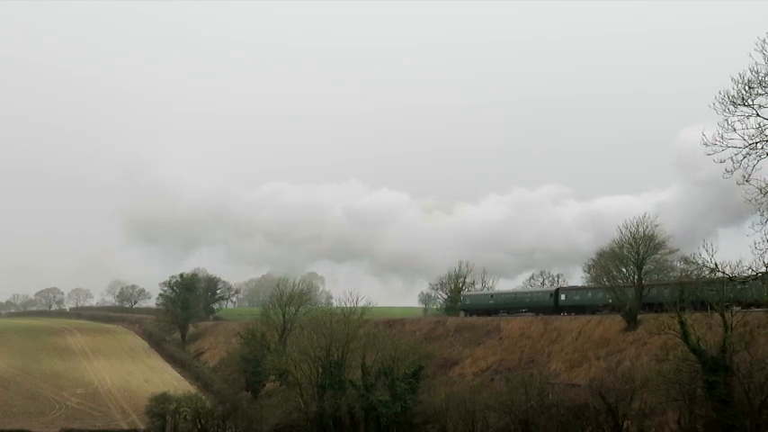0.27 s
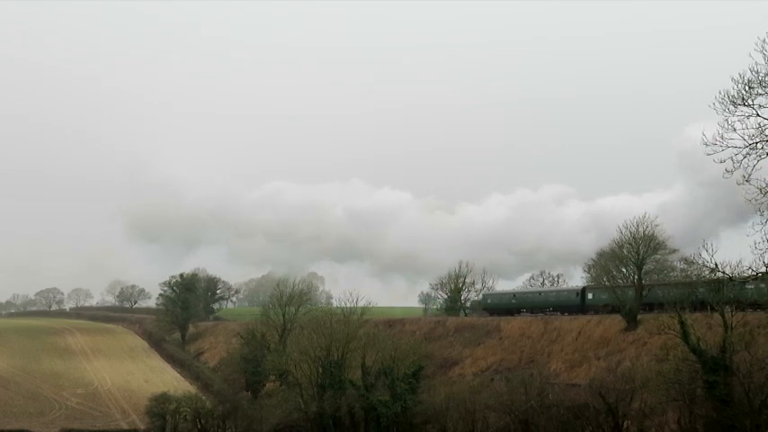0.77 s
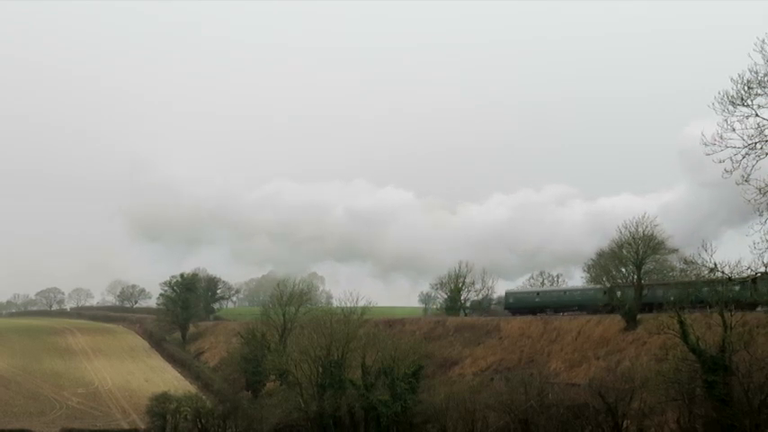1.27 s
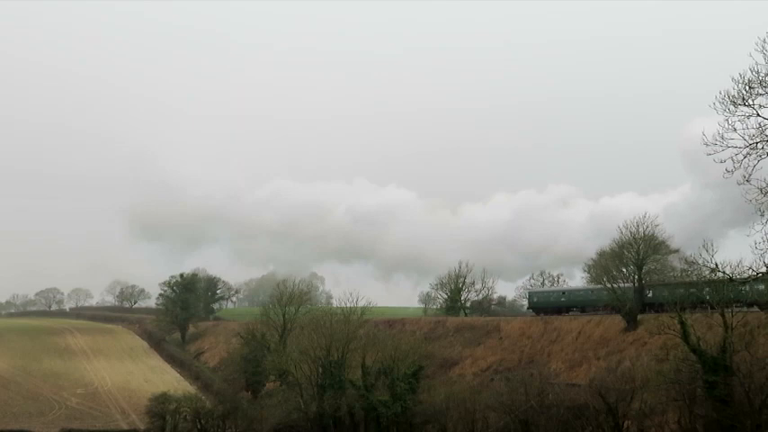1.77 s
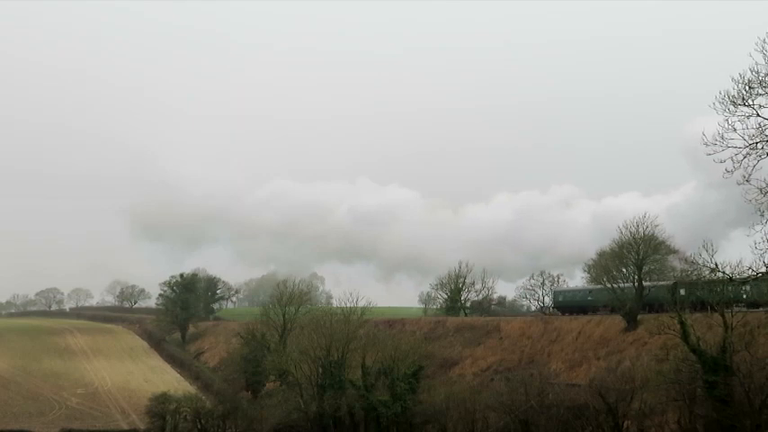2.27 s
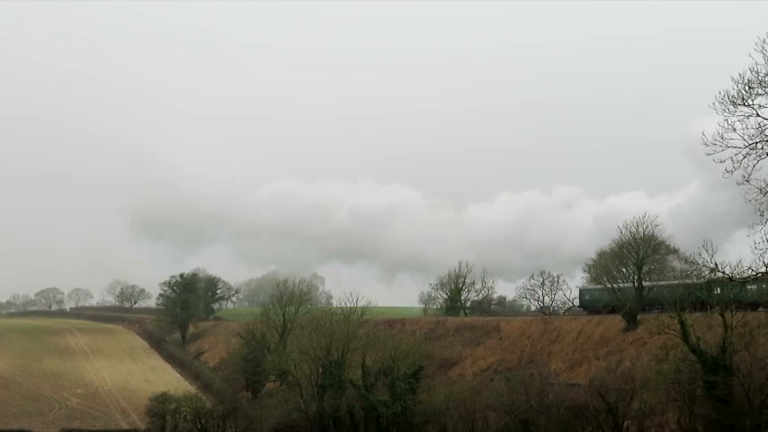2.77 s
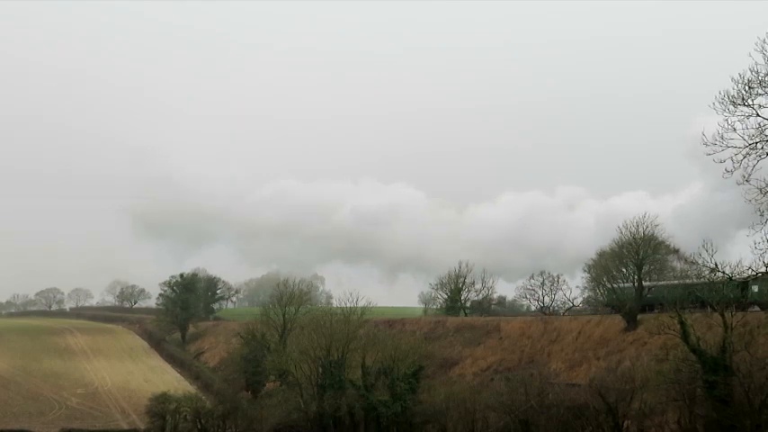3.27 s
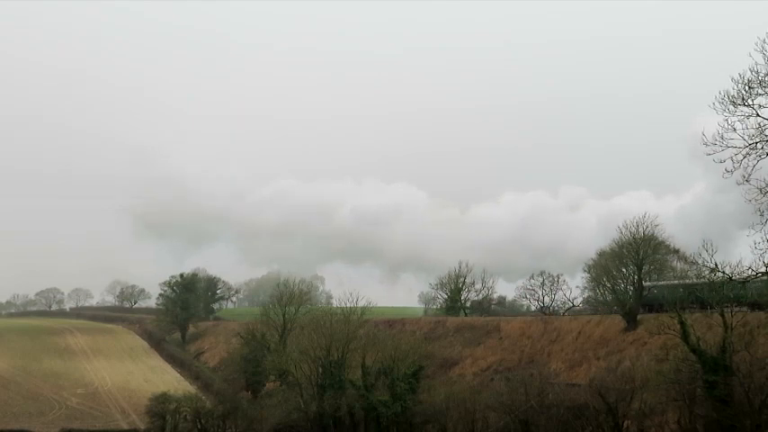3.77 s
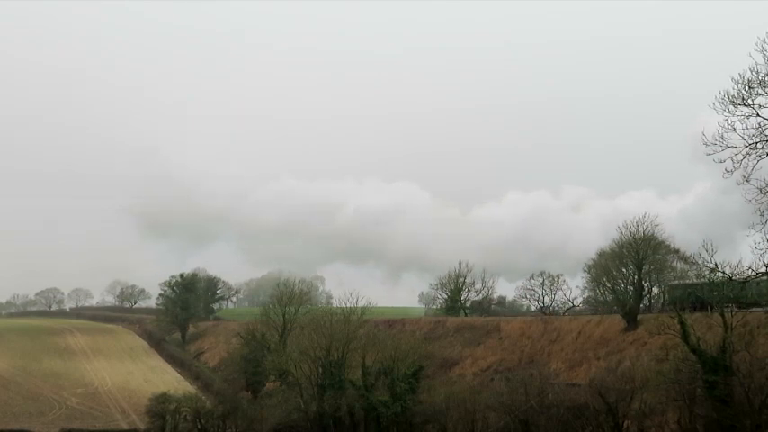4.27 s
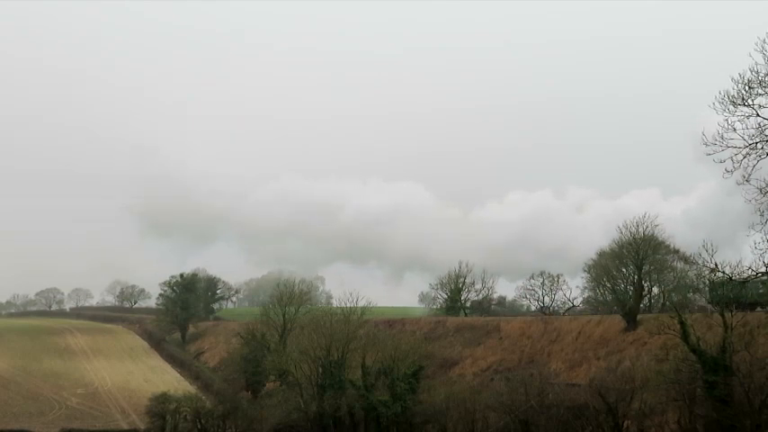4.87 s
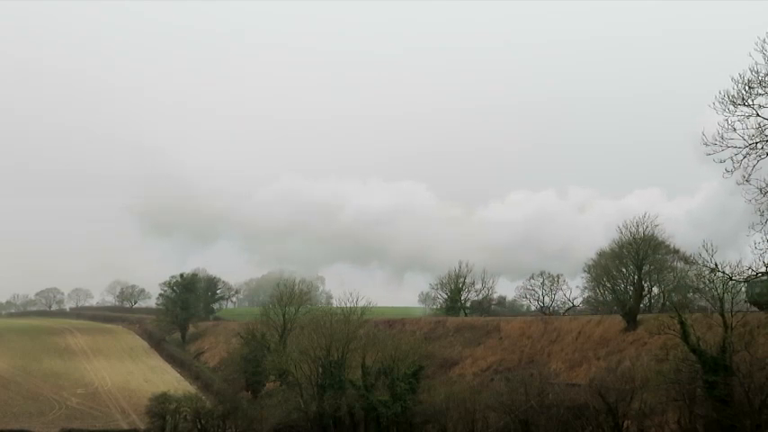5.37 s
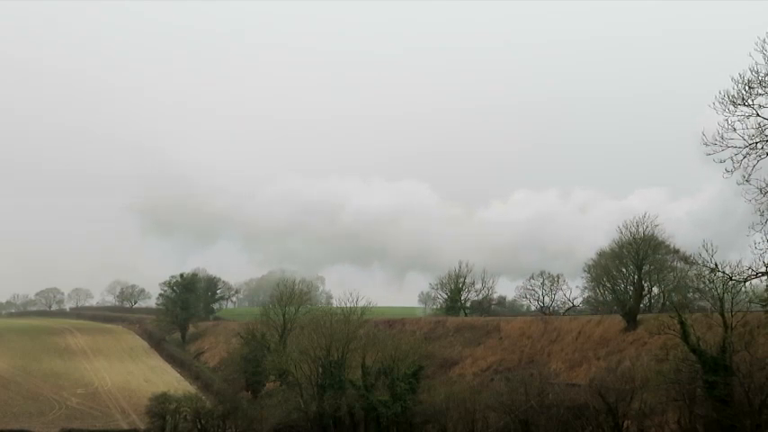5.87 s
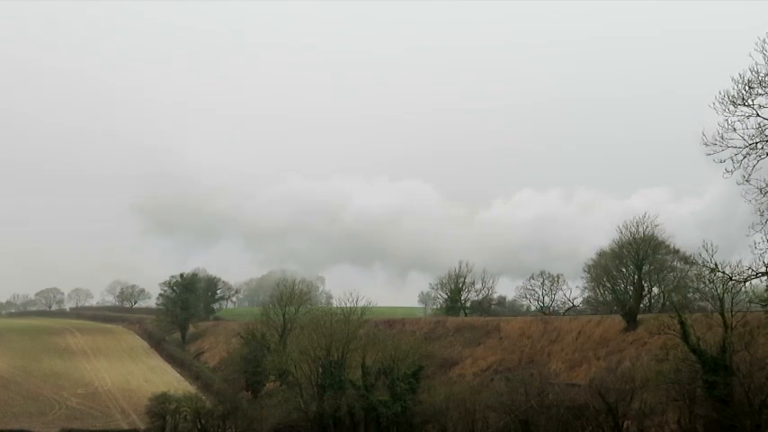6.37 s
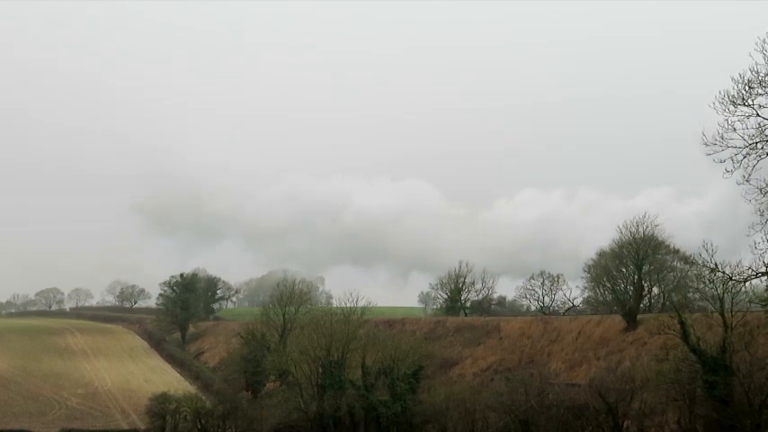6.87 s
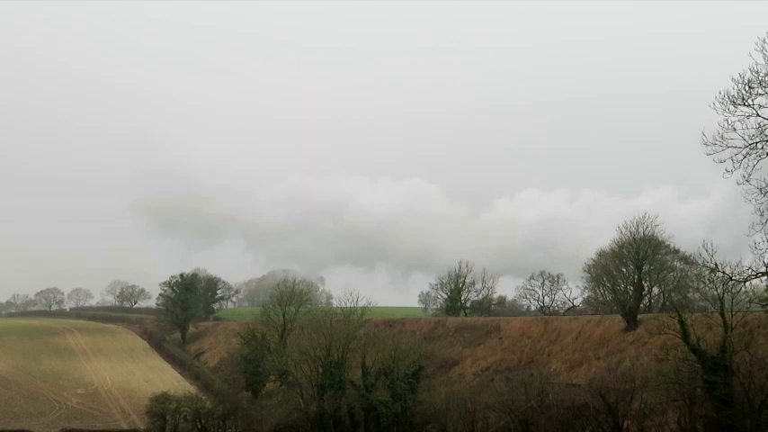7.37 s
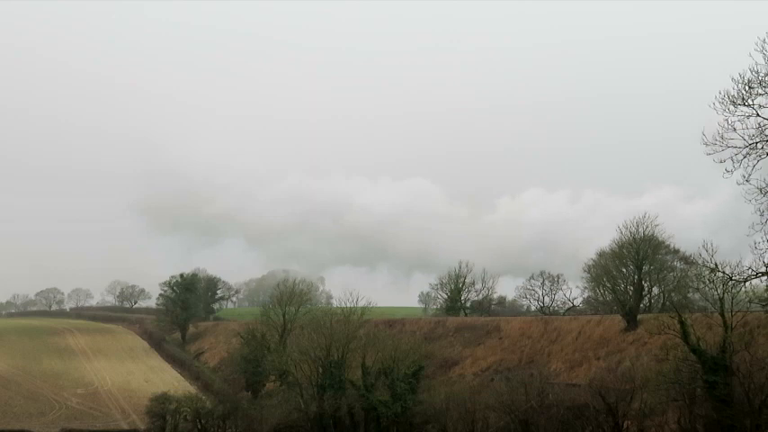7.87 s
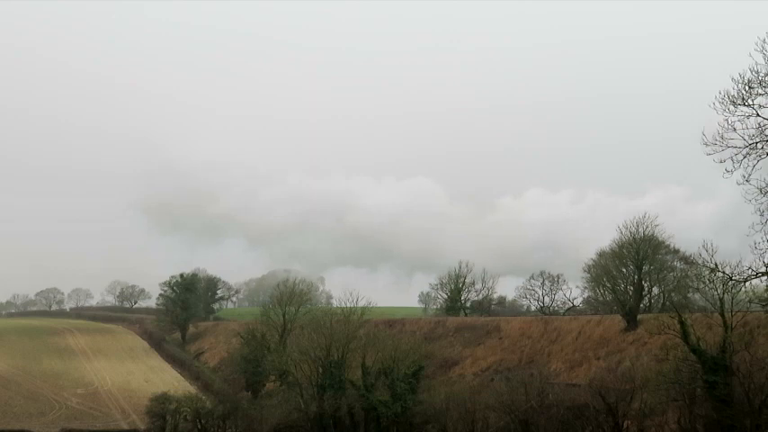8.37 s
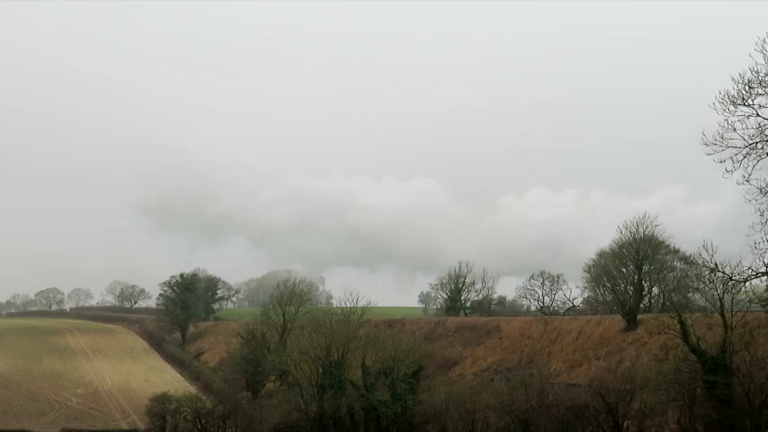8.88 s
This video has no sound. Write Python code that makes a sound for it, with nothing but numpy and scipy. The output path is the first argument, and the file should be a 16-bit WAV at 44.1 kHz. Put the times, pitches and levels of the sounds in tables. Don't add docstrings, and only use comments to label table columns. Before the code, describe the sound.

Quick chimney beats from a departing steam train run continuously, overlapping into a pulsing, low-mid roar with uneven accents. Early puffs are fuller and brighter; later ones become duller, fluctuate, and finally drop away. Low wheel rumble and faint rail singing continue beneath, with muffled thumps around the middle and near the end, and a brief weak metallic squeal after six seconds. The setting is open countryside, heard at a distance through a close stereo microphone pair with light hiss.

```python
import sys
import numpy as np
from scipy import signal
from scipy.fft import rfft, irfft, next_fast_len
from scipy.io import wavfile
from scipy.ndimage import uniform_filter1d

SR = 44100
rng = np.random.default_rng(int(sys.argv[2]) if len(sys.argv) > 2 else 0)


def waveform_to_disk(signal):
    frames = np.transpose(np.atleast_2d(signal))
    scaled = np.clip(frames, -1, 1) * 32767
    samples = np.round(scaled).astype(np.int16)
    wavfile.write(sys.argv[1], SR, samples)


def attenuation_scalar(level_db):
    decades = np.asarray(level_db, float) / 20
    return 10 ** decades


N = 402633
M = next_fast_len(N + SR)
HZ = np.maximum(np.fft.rfftfreq(M, 1 / SR), 1)
OCTAVES = np.log2(HZ)
T = np.arange(M) / SR - .5

# frequency in Hz, level in dB.
SELF_NOISE = [(500, -18), (2000, -8.5), (5000, -10.5), (8000, -13.5), (11500, -16), (12600, -18.5),
              (13500, -22), (14500, -26)]
SELF_NOISE_DB = -64
# frequency in Hz, gain in dB, left minus right in dB, lead of the right in radians.
PORTS = [(30, 0, .3, .02), (60, 0, 1.2, .12), (120, 0, 1.9, .42), (200, 0, 1.0, .82), (300, 0, -.3, 1.05),
         (470, 0, -1.2, 1.22), (530, -7, -2.8, .01), (1000, -7, -5.0, .1), (2000, -7, -3.8, .42),
         (4000, -7, -3.0, 1.2), (7000, -7, -2.0, 1.5)]

# frequency in Hz, level in dB.
SCATTER = [(30, -14.5), (500, -20), (1000, -30), (2000, -20), (4000, -19.5), (8000, -16)]
# time in seconds, level in dB, bass over the ground in dB.
ROLL = [(0, -24, 0), (.4, -24.5, 3), (1.8, -25.5, 0), (2.5, -26.5, 3), (3.2, -27, 0.5), (4.1, -27, -0.5),
        (4.7, -29, 0.5), (5.2, -29, 3.5), (5.8, -28.5, 0.5), (6.5, -30, 3), (7.0, -32, 3.5), (7.6, -30, 1),
        (8.3, -30.5, 3.5), (8.9, -30.5, -1), (9.13, -33.5, 5)]
# frequency in Hz, density in dB per Hz.
WHEELS = [(20, -22), (35, -7.5), (60, -3), (120, -0.5), (200, -1), (300, -1), (450, -3.5), (800, -10.5),
          (1400, -14), (2500, -20.5), (3300, -25.5), (4500, -32), (7000, -43.5), (12000, -63)]
# frequency in Hz, width in Hz, level over the rumble in dB.
RAILS = [(1300, 63, -9.5), (2022, 34, -0.5), (2533, 79, -1.5), (3126, 58, -0.5)]
BASS_SWELL_DB, BASS_DRIFT_DB_S = .6, 0.32
TREBLE_DB, TREBLE_DRIFT_DB_S = -2.05, -0.07
# start in seconds, pitch in Hz, level in dB, ring t60 in seconds.
KNOCKS = [(3.655, 1310, -24, 0.15), (3.655, 2080, -24, 0.044), (5.115, 140.6, -15.5, 0.26),
          (5.159, 94.8, -14.5, 0.18), (4.619, 77.6, -18, 0.28), (2.429, 96, -15, .25),
          (4.107, 116, -19.5, 0.3), (5.4, 133, -14.5, 0.24), (7.869, 126.4, -18.5, .25),
          (8.20, 122.5, -16.5, 0.25), (8.56, 70.3, -18.5, 0.27)]
# time in seconds, pitch in Hz, level in dB.
SQUEAL = [
    (6.08, 2250, -77),
    (6.15, 2400, -44),
    (6.25, 2600, -47),
    (6.34, 2650, -50),
    (6.42, 2650, -82),
]

# frequency in Hz, width in Hz, level in dB.
BOOM = [(89, 59, -10.5), (154, 110, -11), (214.5, 32, 4)]
BARK = [(294.5, 34, 0.2), (391, 86, 0.3), (463.6, 83, -5)]
ROAR = [(578, 180, 0.0085), (665, 180, 0.007)]
RUSH = [(807, 330, 0.6), (996, 83, 0), (1240, 450, -1.5)]
HISS = [(1910, 930, 8.5), (2660, 2800, -2.5), (4500, 14000, -5.5)]
# frequency in Hz, width in Hz, level in dB.
BOOM_FAR = [(87, 100, -11), (151, 25, -3), (200, 88, 2)]
BARK_FAR = [(287, 53, -3), (378, 100, 1), (453, 53, 2.8)]
ROAR_FAR = [(593, 200, -0.92), (750, 170, 0.42)]
RUSH_FAR = [(810, 320, 4), (972, 220, 4.1), (1280, 410, -0.5), (1665, 540, -9)]
FAR_FROM_S, FAR_BY_S = 3.9, 5.9
AIR_DB = 11.5

FIRST_S, BEAT_S, BEAT_COUNT = .004, .1374, 67
SLOWS_FROM_BEAT, SLOWING_S = 24, 4.5e-5
VALVES_DB = [0.89, 0.083, -1.7, 0.48]
# time in seconds, bark level in dB, treble past hedges and banks in dB.
PATH = [(0, -25, -5), (.55, -22, 0.5), (1.05, -24, 4.5), (1.5, -23.5, -1), (2.05, -30, -5),
        (2.4, -31.5, -3.5), (3.0, -26.5, 0.5), (3.5, -30.5, -3.5), (4.0, -26, 0), (4.55, -28, 3),
        (4.95, -30.5, -1), (5.2, -32, 5.5), (5.5, -26, 4.5), (6.3, -32, 4), (6.6, -30, 4), (7.1, -28.5, -1),
        (7.8, -26, -4.5), (9.1, -42.5, -3.5)]
# level against the bark in dB, drift with distance in dB per second,
# share of the treble shading.
PARTS = [
    (5.5, -1.1458, 0.0094),
    (1.5, 0.26, 0.18),
    (-9, -1.05, 0.77),
    (-16, 1.5, 1.02),
    (-21.5, -0.01, 0.27),
]
# rise, fall and lead in seconds.
VALVE_SHAPES = [
    (0.044, 0.05, 0.0043),
    (0.039, 0.051, 0.002),
    (0.042, 0.065, .003),
    (0.041, 0.055, 0.0034),
    (.042, 0.068, .002),
]
FLAT_RISE, FLAT_FALL = 2.6, 1.66
# time in seconds, boom, bark, roar and rush in dB.
ACCENTS_NEAR = [(0.004, 2.5, 7, -7.5, 6.5), (0.141, -1, 2, 5.5, -5), (0.279, 3, 3.5, 4, 2),
                (0.416, -6, 2, 5.5, 3), (0.554, -10, 0.5, -2, 0), (0.691, 3, -4, 6, 1),
                (0.828, 1.5, -1, -0.5, 0.5), (0.966, 2.5, 0.5, 1.5, 2), (1.103, 1, 1.5, -3.5, 1),
                (1.241, -1.5, -1.5, -1, -2.5), (1.378, 1, -3, -0.5, -3.5), (1.515, -0.5, -1, 4, 1.5),
                (1.653, 2, -2.5, -0.5, -4), (1.79, 6, -3.5, 1.5, 7), (1.928, 7.5, -1.5, -1.5, -12),
                (2.065, 6, 3.5, 7.5, -2), (2.202, 4.5, 0, -10, 4), (2.34, -1.5, -3.5, -0.5, 2),
                (2.477, 1.5, 1, 2.5, 3), (2.615, 5, -2, 0, 0.5), (2.752, 2, -2.5, -11, 0),
                (2.889, 1, -4.5, -2, -3), (3.027, -4, -8, -3, -3), (3.164, 4, -4, -11, 1.5),
                (3.302, 4, -0.5, -3, 1), (3.439, 6.5, 2.5, 7.5, 4.5), (3.577, 2, -2.5, -7, -6),
                (3.714, 4.5, -0.5, 4, -3.5), (3.852, 4, -5, -5.5, -2), (3.99, 4.5, 1.5, -5, -4),
                (4.128, -3.5, -0.5, -7.5, -2), (4.266, -2.5, 1.5, 2, -2.5), (4.404, 2.5, 0, 3.5, -2)]
ACCENTS_FAR = [(4.542, -6, -4, 4, -1.5), (4.68, 2.5, -3.5, 7.5, -1), (4.818, -2.5, 1.5, 7, 4),
               (4.957, 4.5, 3, 10, 9.5), (5.095, 6.5, 3, 7.5, 4), (5.234, 6.5, 1.5, -0.5, 3),
               (5.373, 3, -0.5, 2, 1), (5.512, 1.5, -0.5, -14, -1.5), (5.65, -3, -0.5, -12, -3),
               (5.789, 4.5, 2, 1, 0.5), (5.928, 5, -1.5, 10, -1), (6.068, 1, 1.5, 5, -2),
               (6.207, 8.0, 1.5, 3.5, 1), (6.346, 2.5, 3, 7, 3), (6.487, 6, 1, 5.5, 2.5),
               (6.625, 11, 3.5, 5, 2.5), (6.765, 5.5, 4.5, -2, 3), (6.904, 3.5, 2.5, -5.5, 4),
               (7.044, 4, 2, 6, 3), (7.184, 8.5, 0, 8, 2.5), (7.324, 2.5, 1.5, 3.5, -0.5),
               (7.464, 1, -2, -1, -1), (7.604, 0.5, -1.5, 2.5, -2), (7.744, -2.5, -3.5, 3, -2),
               (7.885, -16.5, -6, -15, -2), (8.025, -10.5, -0.5, 5, 1), (8.166, -3, -5, -3.5, 2),
               (8.306, -5, 0, 3, 0.5), (8.447, 8.5, -2.5, 4, 3.5), (8.588, 7, 3.5, -5, 3.5),
               (8.729, -3, -1.5, 3, 1), (8.87, 5, 2.5, -4.5, 0.5), (9.012, -13.5, 2.5, -1, 4.5)]
HISS_ACCENTS_DB = [2.5, 1, 3, 3.5, 4, 5, 2.5, 1, 2.5, -1, 0, 0, -0.5, 7.5, 4, 9, 0, 2, 4, 3, 5, -4, 1, 1, 1,
                   7, -8, -2, -11, -1, 2, -0.5, 1.5, 3.5, -4, -3, -4, 0, 1, 1, 1, 0, 4, 1, 4, 5, 0, -3, -4.5,
                   -5, 2, 4, 0, -9, 4, 2, 0, -1, -2, 5, 3, 8, -1, -5, 0, 7, 13.5]
CHANCE_DB = .2
# start in seconds, roar in dB, rush in dB.
SLUGS = [(0.02, -20, -36), (0.097, -26.5, -36), (0.116, -17, -27), (0.137, -15.5, -36), (0.235, -20.5, -41),
         (0.26, -16.5, -33.5), (0.382, -20, -36), (0.515, -18.5, -36.5), (0.536, -14.5, -28),
         (0.576, -16, -39.5), (0.65, -14.5, -29), (0.677, -13.5, -26.5), (0.783, -16, -29),
         (0.92, -24.5, -41), (0.949, -24.5, -30), (1.08, -16, -26.5), (1.206, -19, -25),
         (1.226, -20.5, -27), (1.314, -20.5, -40), (1.338, -20, -28.5), (1.379, -19.5, -32.5),
         (1.48, -15.5, -35.5), (1.622, -27.5, -38.5), (1.697, -14.5, -30), (1.756, -22, -35.5),
         (2.303, -34.5, -41.5), (2.591, -21.5, -37), (2.755, -24.5, -48), (2.899, -29.5, -32),
         (3.71, -23.5, -31), (4.234, -23.5, -47), (4.384, -22, -39), (4.402, -16, -30.5),
         (4.783, -33, -39.5), (4.804, -22.5, -32.5), (4.927, -18.5, -28), (5.061, -29, -32),
         (5.336, -23, -28.5), (5.477, -20, -39), (5.612, -21.5, -26.5), (5.746, -24, -31.5),
         (5.907, -16.5, -31), (6.036, -19, -34.5), (6.064, -16.5, -24), (6.172, -19, -31.5),
         (6.344, -23.5, -30.5), (6.438, -27, -42), (6.459, -24.5, -31), (6.483, -17.5, -20),
         (6.582, -21, -36), (6.724, -22.5, -26.5), (6.74, -25.5, -25), (6.88, -21.5, -26.5),
         (7.018, -23.5, -43.5), (7.138, -20, -32), (7.164, -13, -28), (7.412, -20, -36.5),
         (7.702, -20.5, -34), (7.852, -23, -29), (8.191, -24, -39)]
# start in seconds, boom in dB, bark in dB.
THUDS = [(0.096, -9, -24), (0.247, -5, -27.5), (0.381, -10.5, -21), (0.518, -18.5, -15), (0.66, -13, -13.5),
         (0.785, -15.5, -16), (0.919, -7.5, -24.5), (1.2, -13, -30), (1.2, -8, -15), (1.324, -13.5, -15),
         (1.388, -16, -32.5), (1.466, -15, -20.5), (1.615, -7, -28.5), (1.749, -8, -26), (1.892, -8, -18),
         (2.031, -1, -20.5), (2.214, -11, -20.5), (2.283, -17, -24), (2.419, -19, -26), (2.549, -29, -34.5),
         (3.257, -22, -25.5), (3.654, -16.5, -24), (3.71, -9.5, -29.5), (3.784, -9.5, -22),
         (3.944, -13.5, -25), (4.058, -5, -21), (4.102, -17, -22), (4.228, -7.5, -22), (4.37, -14.5, -25),
         (4.492, -14, -14), (4.636, -11.5, -14), (4.676, -12, -19), (4.802, -16, -14), (4.936, -10, -19),
         (5.493, -9.5, -18), (5.698, -22, -36), (5.754, -18, -26.5), (5.755, -18.5, -22.5),
         (5.891, -14, -24), (5.92, -6.5, -20), (6.184, -12, -21), (6.303, -21, -31), (6.343, -11, -23),
         (6.439, -13, -27), (6.476, -10, -21.5), (6.526, -21, -23), (6.737, -23, -24), (6.85, -8, -20.5),
         (7.014, -9.5, -22), (7.057, -15, -12), (7.148, -19.5, -21), (7.858, -24, -16.5), (8.005, -13, -30),
         (8.126, -21, -29), (8.285, -24.5, -25.5), (8.39, -21, -23), (8.449, -15, -20.5)]
# level in dB, rise in seconds, fall in seconds.
SLUG_SHAPES = [
    (-12, 0.0062, 0.015),
    (-3.5, 0.0046, 0.013),
    (-14, 0.0042, 0.013),
    (-5.5, 0.0057, 0.017),
    (-20.5, .004, 0.018),
]
STEADY_S = .09
ECHO_DB, ECHO_S = -10, 0.019


def on_log(table, column=1):
    table = np.array(table)
    return np.interp(OCTAVES, np.log2(table[:, 0]), table[:, column])


def over_time(table, times):
    s, *columns = np.transpose(table)
    return [np.interp(times, s, column) for column in columns]


def colour(x, gain):
    return irfft(rfft(x) * gain, M)


def unit(x):
    return x / np.sqrt(np.mean(x ** 2))


def smooth_twice(x, first, second):
    return uniform_filter1d(uniform_filter1d(x, first), second)


def walk(rate):
    hold = int(SR / rate)
    levels = np.repeat(rng.standard_normal(M // hold + 1), hold)
    return unit(smooth_twice(levels, hold, hold)[:M])


def resonances(modes):
    power = 0
    for hz, width, db in modes:
        detune = (HZ - hz ** 2 / HZ) / width
        power = power + (attenuation_scalar(db) / (1 + detune ** 2)) ** 2
    return np.sqrt(power)


def self_noise():
    gain = attenuation_scalar(on_log(SELF_NOISE))
    return attenuation_scalar(SELF_NOISE_DB) * np.array([unit(colour(rng.standard_normal(M), gain)) for _ in "LR"])


def ports(x):
    gain_db, pan_db, lead = (on_log(PORTS, column) for column in (1, 2, 3))
    heard = []
    for side in (1, -1):
        heard.append(colour(x, attenuation_scalar(gain_db + side * pan_db / 2) * np.exp(-.5j * side * lead)))
    return np.array(heard)


def scattered(rumble):
    level = attenuation_scalar(over_time(ROLL, T)[0] + TREBLE_DB + TREBLE_DRIFT_DB_S * T)
    gain = rumble * attenuation_scalar(on_log(SCATTER))
    return np.array([level * colour(rng.standard_normal(M), gain) for _ in "LR"])


def wheels(shape, octaves, swell_db=.2, flicker_db=.7, patchy_db=.8):
    db, ground_db = over_time(ROLL, T)
    bass_db = ground_db + BASS_DRIFT_DB_S * T + BASS_SWELL_DB * walk(7.6)
    treble_db = TREBLE_DB + TREBLE_DRIFT_DB_S * T
    swell, out = walk(1.1), 0
    for octave in octaves:
        band = np.cos(np.pi * np.clip(OCTAVES - octave, -.5, .5))
        low = np.clip(8 - octave, 0, 1)
        high = np.clip((octave - 8.5) / 2, 0, 1)
        band_db = db + low * bass_db + high * treble_db + swell_db * swell
        gain = attenuation_scalar(band_db + (flicker_db + high * patchy_db) * walk(7.8))
        out = out + gain * colour(rng.standard_normal(M), band * shape)
    return out


def knocks(cycles=1.4):
    out = np.zeros(M)
    for s, hz, db, t60 in KNOCKS:
        age = np.maximum(T - s, 0)
        build = 1 - np.exp(-age * hz / cycles)
        out += attenuation_scalar(db - 60 * age / t60) * build * np.sin(2 * np.pi * hz * age)
    return out


def squeal(waver=.02, rough_db=6):
    s, hz, db = np.transpose(SQUEAL)
    level_db = np.interp(T, s, db, left=-200, right=-200)
    level = attenuation_scalar(level_db + rough_db * walk(67))
    pitch = np.interp(T, s, hz) * (1 + waver * walk(40))
    return level * np.sin(2 * np.pi * np.cumsum(pitch) / SR)


def echoes(x):
    age = np.arange(SR // 4) / SR
    tail = rng.standard_normal(SR // 4) * np.exp(-age / ECHO_S)
    thin = HZ / (HZ + 600)
    return colour(x, rfft(tail / np.linalg.norm(tail), M) * attenuation_scalar(ECHO_DB + on_log(PORTS)) * thin)


def via_ground(x, lag_s=0.00343, drift_s=0.000715, share=0.27):
    late = T - lag_s - drift_s * walk(2.5)
    return (x + share * np.interp(late, T, x)) / np.sqrt(1 + share ** 2)


def beat_times():
    k = np.arange(BEAT_COUNT)
    return FIRST_S + BEAT_S * k + SLOWING_S * np.maximum(k - SLOWS_FROM_BEAT, 0) ** 2


def beat_levels():
    s = beat_times()
    level_db, open_db = over_time(PATH, s)
    level_db = level_db + np.resize(VALVES_DB, BEAT_COUNT)
    accents = over_time(list(ACCENTS_NEAR) + list(ACCENTS_FAR), s) + [np.array(HISS_ACCENTS_DB)]
    levels = []
    for (db, drift, share), accent_db in zip(PARTS, accents):
        chance_db = CHANCE_DB * rng.standard_normal(BEAT_COUNT)
        levels.append(level_db + db + drift * s + share * open_db + chance_db + accent_db)
    return levels


def puffs(db, rise_s, fall_s, lead_s):
    power = np.zeros(M)
    for s, gain in zip(beat_times(), attenuation_scalar(db)):
        near = slice(*np.searchsorted(T, (s - .15, s + .2)))
        age = T[near] - s + lead_s
        span = np.where(age < 0, -age / rise_s, age / fall_s)
        flatness = np.where(age < 0, FLAT_RISE, FLAT_FALL)
        power[near] += (gain * np.exp(-span ** flatness)) ** 2
    return np.sqrt(power)


def slugs(times, db, rise_s, fall_s):
    power = np.zeros(M)
    for s, gain in zip(times, attenuation_scalar(db)):
        near = slice(*np.searchsorted(T, (s, s + .12)))
        age = T[near] - s
        power[near] += (gain * (1 - np.exp(-age / rise_s)) * np.exp(-age / fall_s) * 2) ** 2
    return power


def surges():
    thud_s, boom_db, bark_db = np.transpose(THUDS)
    slug_s, roar_db, rush_db = np.transpose(SLUGS)
    events = ((thud_s, boom_db), (thud_s, bark_db), (slug_s, roar_db), (slug_s, rush_db), (slug_s, rush_db))
    return [slugs(s, db + lift_db, rise_s, fall_s) for (s, db), (lift_db, rise_s, fall_s) in
            zip(events, SLUG_SHAPES)]


def steady(x):
    power = smooth_twice(x ** 2, int(STEADY_S * SR), int(STEADY_S * SR / 2))
    return x / np.sqrt(power + 1e-12)


def exhaust(eddy_db=1.0, own_db=0.76):
    eddies, parts = walk(70), []
    air = attenuation_scalar(-AIR_DB * (HZ / 5000) ** 2)
    far = np.clip((T - FAR_FROM_S) / (FAR_BY_S - FAR_FROM_S), 0, 1)
    shapes = ((BOOM, BOOM_FAR), (BARK, BARK_FAR), (ROAR, ROAR_FAR), (RUSH, RUSH_FAR), (HISS,))
    for pair, db, surge, valve in zip(shapes, beat_levels(), surges(), VALVE_SHAPES):
        flow = np.sqrt(puffs(db, *valve) ** 2 + surge)
        jet = rfft(attenuation_scalar(eddy_db * eddies + own_db * walk(25)) * rng.standard_normal(M))
        rung = [flow * steady(irfft(jet * resonances(part) * air, M)) for part in pair]
        parts.append((1 - far) * rung[0] + far * rung[-1])
    boom, bark, *upper = parts
    return colour(boom + bark + via_ground(sum(upper)), 1 / attenuation_scalar(on_log(PORTS)))


def scene():
    rumble = unit(attenuation_scalar(on_log(WHEELS))) * attenuation_scalar(2.0)
    hiss = self_noise()
    field = scattered(rumble)
    roll = wheels(rumble * (1 + resonances(RAILS)), np.arange(4, 13.5, .5))
    beats = exhaust()
    direct = ports(beats + roll + knocks() + squeal())
    returned = np.array([echoes(beats) for _ in "LR"])
    start = SR // 2
    return (direct + returned + field + hiss)[:, start:start + N]


def roll_off(x):
    return signal.sosfilt(signal.butter(12, 14500, fs=SR, output="sos"), x)


def record(dry):
    dry = dry * np.clip(np.minimum(np.arange(N) + 1, N - np.arange(N)) / 8, 0, 1)
    mid = (dry[0] + dry[1]) / 2
    low_pass = signal.butter(5, 8800, fs=SR, output="sos")
    side = signal.sosfiltfilt(low_pass, (dry[0] - dry[1]) / 2)
    return roll_off(np.array([mid + side, mid - side]))


dry = scene()
out = record(dry)
waveform_to_disk(out)
```